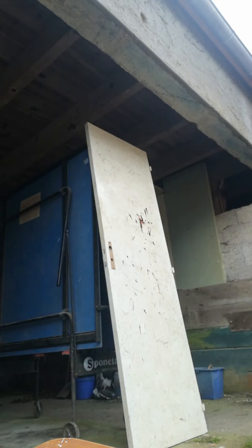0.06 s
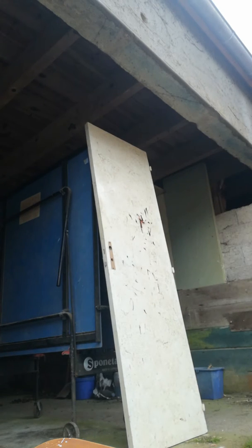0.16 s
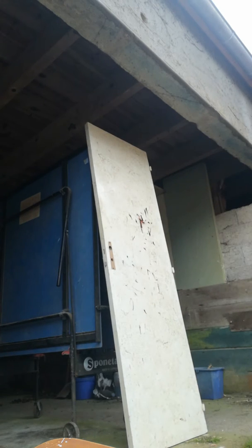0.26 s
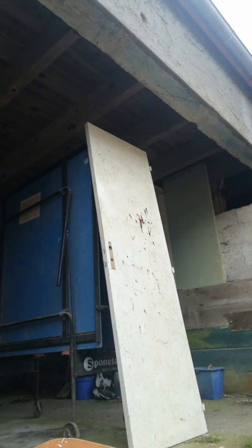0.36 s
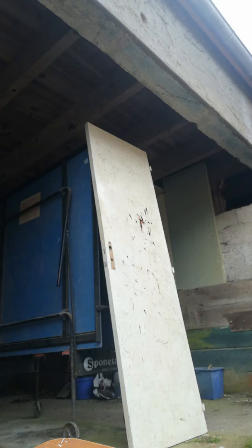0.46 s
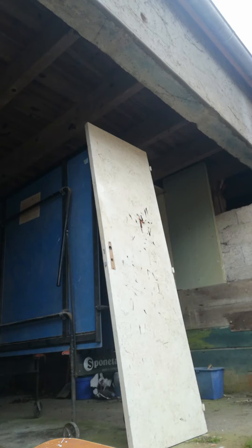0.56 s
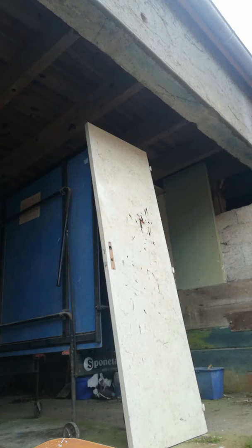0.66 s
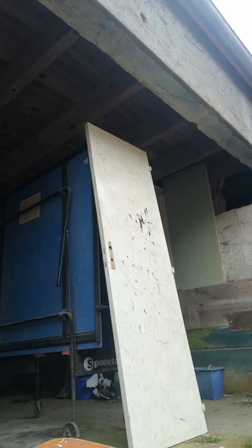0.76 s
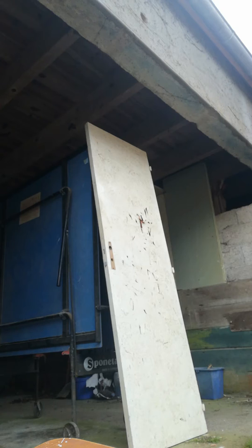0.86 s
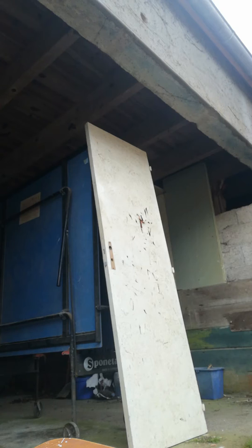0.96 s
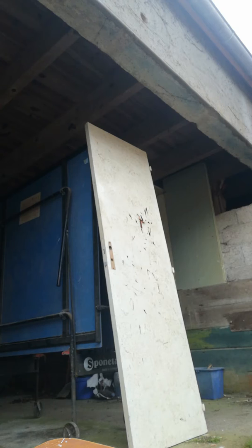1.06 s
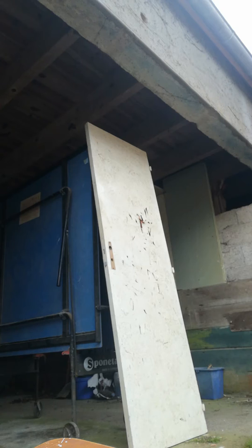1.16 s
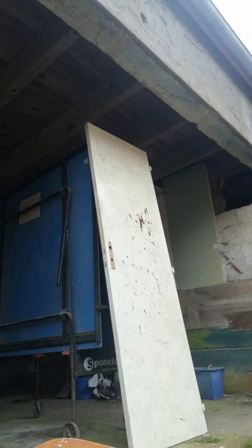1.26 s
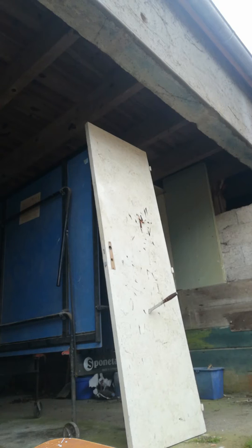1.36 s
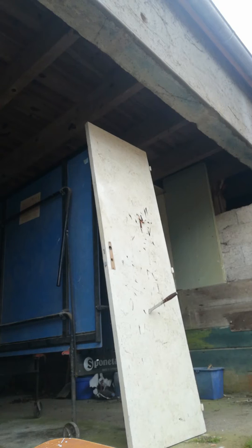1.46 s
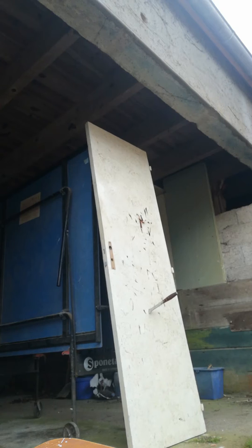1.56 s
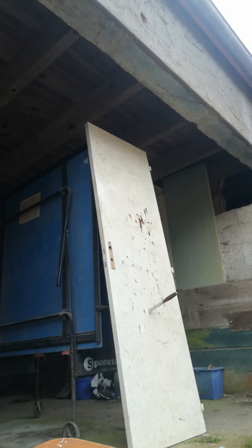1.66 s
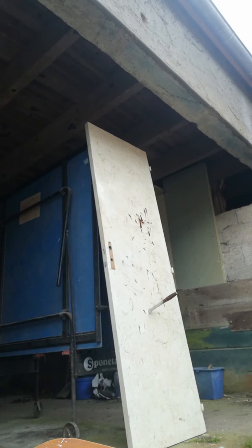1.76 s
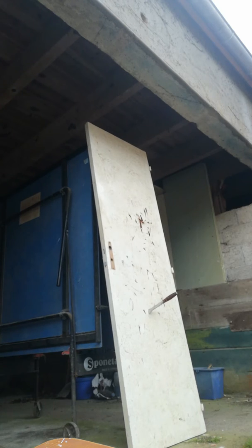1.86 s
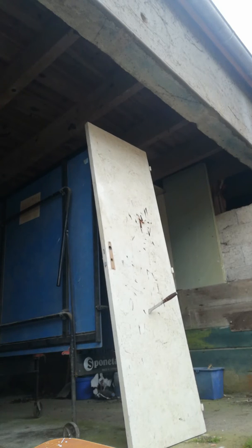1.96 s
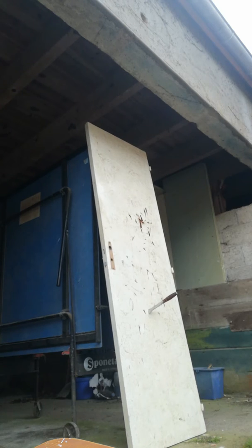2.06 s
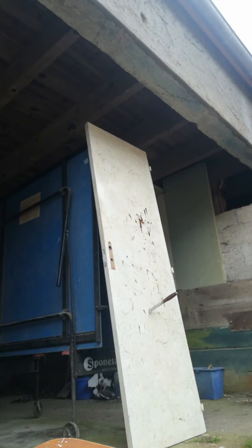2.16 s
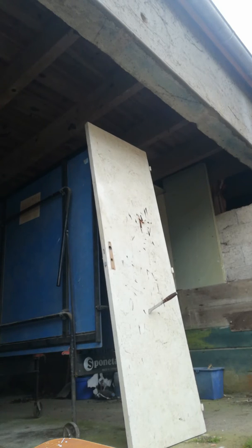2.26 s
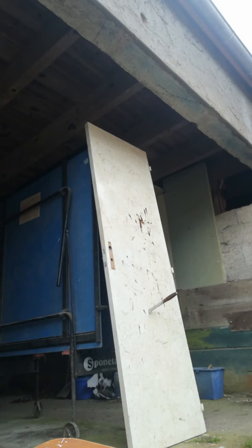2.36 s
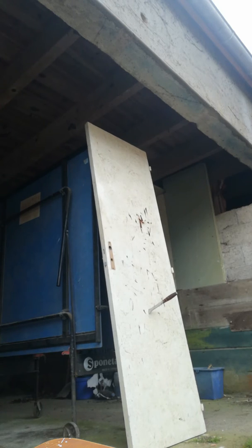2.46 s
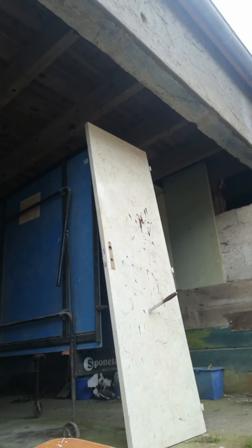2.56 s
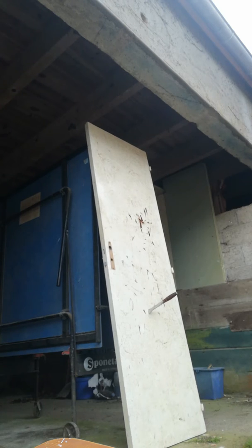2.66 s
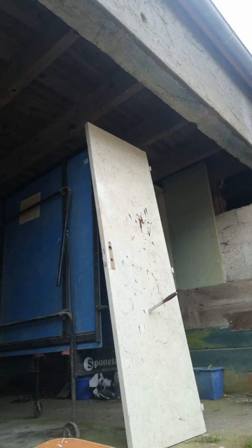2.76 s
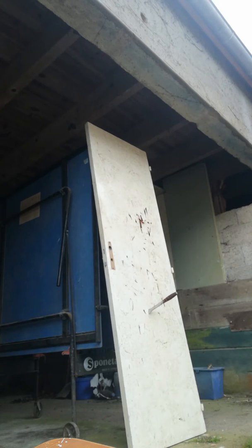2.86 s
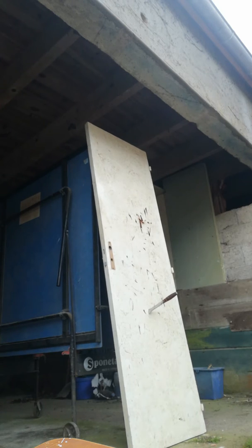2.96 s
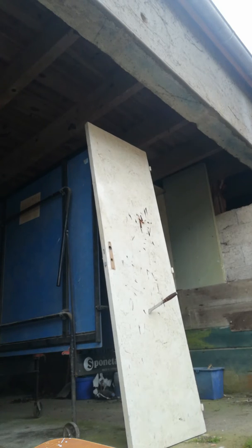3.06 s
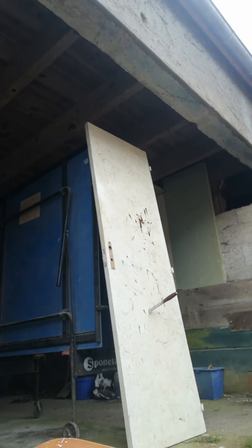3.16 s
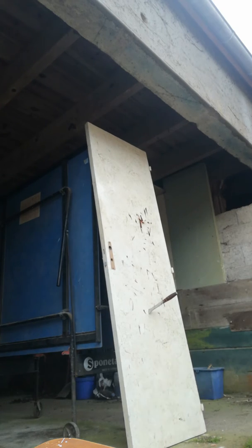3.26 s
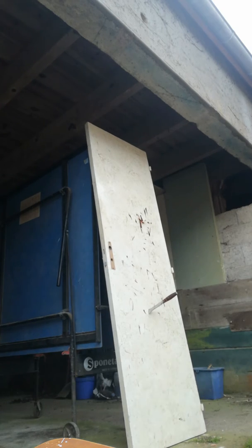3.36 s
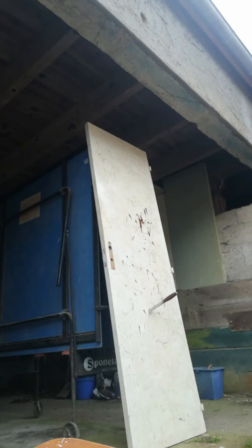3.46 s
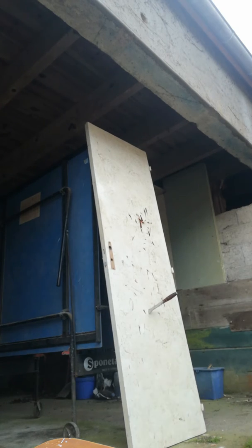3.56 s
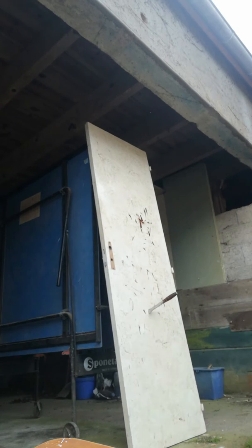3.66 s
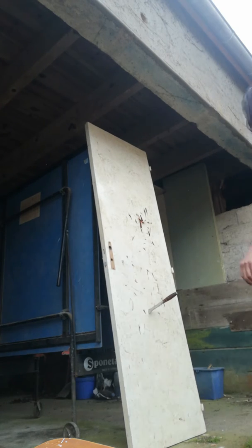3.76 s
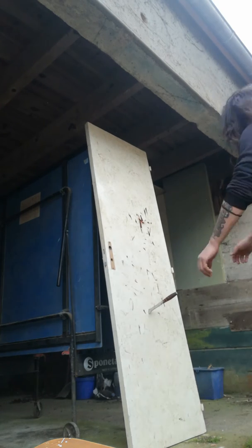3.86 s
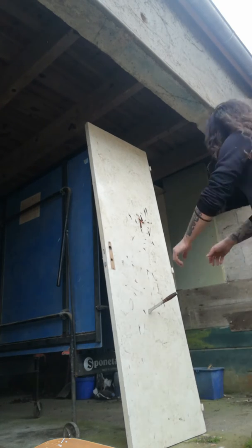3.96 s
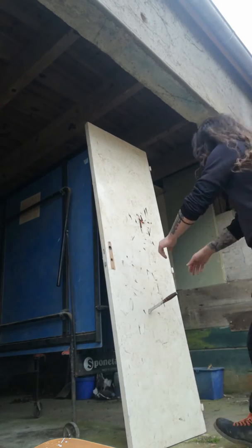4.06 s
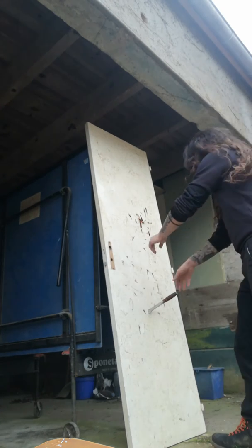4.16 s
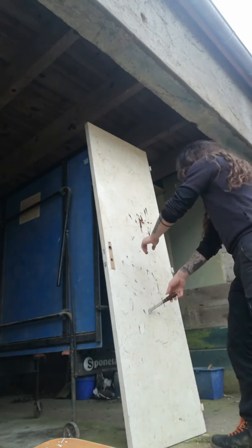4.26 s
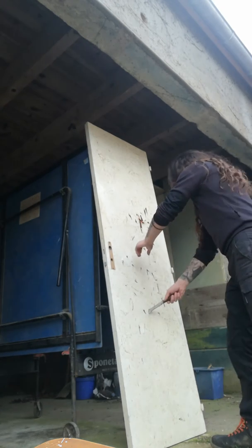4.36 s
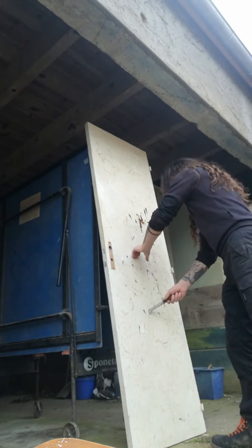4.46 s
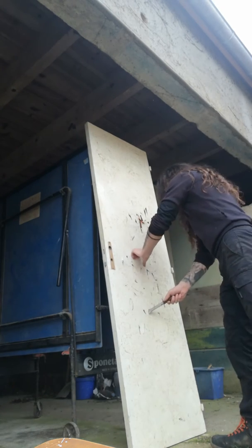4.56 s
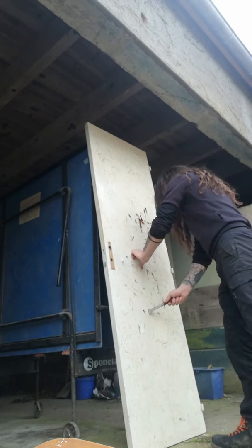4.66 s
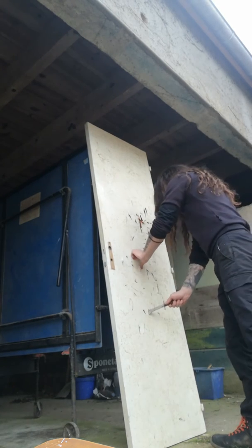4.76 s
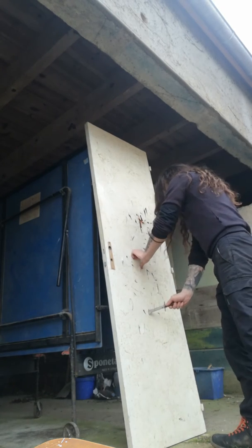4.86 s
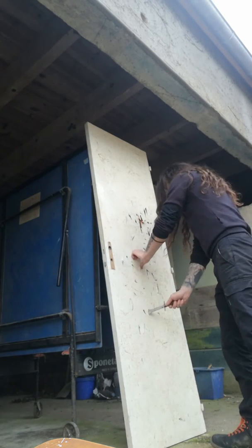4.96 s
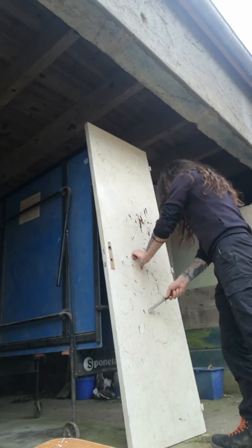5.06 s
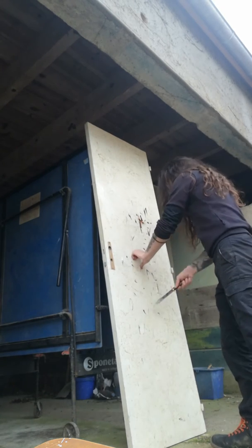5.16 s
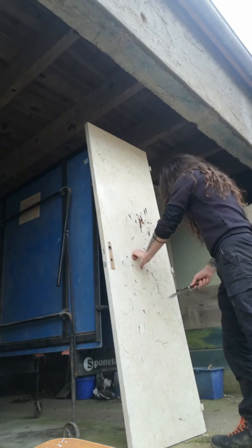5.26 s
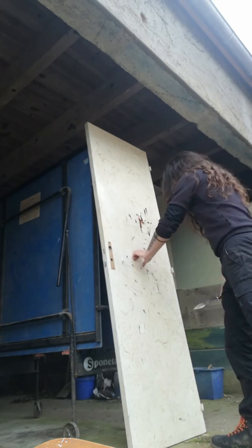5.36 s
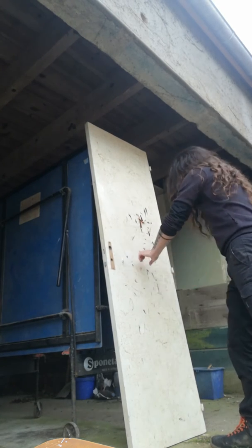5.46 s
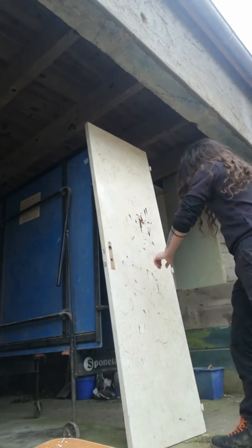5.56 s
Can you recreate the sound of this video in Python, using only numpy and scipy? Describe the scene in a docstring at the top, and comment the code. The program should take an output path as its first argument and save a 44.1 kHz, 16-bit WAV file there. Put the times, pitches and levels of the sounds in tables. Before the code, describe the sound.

Faint blade clinks and scuffs, a sudden loud knife hit in a hollow door, rocking thuds, footsteps, then gritty scraping and metallic chirps.

```python
"""A knife is thrown into an old wooden door that leans under a shed roof.
First blades clink in the hand and shoes scuff: modal rings with noise bursts, and grainy noise strokes.
The point cracks into the wood, the panel booms and rattles: shaped noise, modal rings, a gated sine.
Steps approach, a hand grips, the blade is levered out: noise chopped by random catches, then chirps.
Throughout, harmonics of a far-off engine hum through its gears over coloured noise for the air."""
import sys
import numpy as np
from scipy import signal
from scipy.fft import rfft, irfft
from scipy.io import wavfile
from scipy.ndimage import uniform_filter1d

SR = 44100
rng = np.random.default_rng(int(sys.argv[2]) if len(sys.argv) > 2 else 0)


def transcribe(u):
    """Save the signal u as a 16-bit wav file named by the first command-line argument.

    u: samples, shape (n,) or (channels, n), limited to [-1, 1]; the rate is SR.
    q: integer samples, one column per channel.
    """
    v = np.clip(np.atleast_2d(u).T, -1, 1)
    q = np.round(v * 32767).astype(np.int16)
    wavfile.write(sys.argv[1], SR, q)


N = 247401
TIME = np.arange(N) / SR
BINS = np.fft.rfftfreq(N, 1 / SR)

HIT_S = 1.3244
PANEL_HZ = 100.3  # main mode of the door panel
# stages of the blow: (level [dB], attack [s], hold [s], decay [s])
BITE_SHAPE = (-9, .0005, .004, .005)  # the point splits the wood
KNOCK_SHAPE = (-19, 0.0055, 0.0007, .009)  # the panel gives
RATTLE_SHAPE = (-21.8, .012, .04, .088)  # the door's skin rattles on
TICK_SHAPE, TICK_DELAY_S = (-13.5, .0004, .0008, .0012), .002  # the blade itself ticks as it stops dead
RATTLE_STOP_S, RATTLE_STOP_DECAY_S = .235, .03  # after the blow: the support damps the skin
CRACK_RISE_S = .0006  # the wood takes a moment to start ringing
# spectra of the splitting, the knock, the rattle and the clatter: (frequency [Hz], density [dB])
BITE_COLOUR = [(88, -36.5), (150, -6), (509, -18), (1020, -1.5), (1370, -8), (1950, -2.5), (2600, -8.5),
               (3150, -6.5), (4140, -16.5), (4740, -15), (6980, -12.5), (8320, -7.5), (12500, -30.5),
               (14600, -25), (15500, -39)]
KNOCK_COLOUR = [(200, -19.5), (480, -19), (740, 0), (880, -10.5), (1080, 2), (1300, -4), (1550, -18),
                (1950, -6), (2600, -13), (6000, -25)]
RATTLE_COLOUR = [(210, -16), (330, 1), (480, -16), (620, -11.5), (800, -4), (1030, -1), (1330, -1.5),
                 (1550, -6), (2100, -6.5), (2500, -10.5), (3400, -9.5), (5200, -11.5), (6600, -7.5),
                 (8000, -12.5), (10000, -13.5), (15500, -34)]
CLATTER_COLOUR = [(200, -12), (330, -3), (520, -12), (850, -1), (1250, 0), (1550, -7), (2050, -5),
                  (3300, -10), (5000, -21), (8000, -30), (15000, -50)]
# resonances of the door's skin: (frequency [Hz], width [Hz], lift [dB])
SKIN = [(889, 25, 6.5), (1045, 25, 6), (1162, 25, 5), (1228, 40, 5), (1346, 25, 5.5), (1480, 22, 7),
        (1637, 35, 4.5), (1710, 28, 8), (2050, 60, 5), (2610, 40, 2.5), (2960, 25, 5.5), (3100, 35, 7.5),
        (3300, 54, 3.5), (3720, 100, 4.5), (4264, 15, 2.5), (4833, 72, 3.5)]
# the loose skin and the support clatter as the door rocks: (time [s], level [dB], decay [s])
CLATTERS = [(1.3555, -23, .008), (1.377, -23.5, .011), (1.425, -31, .014), (1.47, -32.5, .016),
            (1.511, -32, .016), (1.539, -29, .022), (1.574, -34.5, .012), (1.613, -43, .012),
            (1.699, -46, .008), (1.727, -43, .022), (1.824, -47, .011), (1.848, -50, .01),
            (1.915, -51, .014), (1.962, -53, .015)]
# modes of the struck wood: (frequency [Hz], relative level [dB], t60 [s])
WOOD = [(700, -7, .4), (764, -5, .35), (889, -5, .55), (953, -1, .37), (1018, -6, .7), (1045, -3, .65),
        (1070, -4, .55), (1165, -3, .55), (1195, -4, .8), (1260, -1, .45), (1343, -1, .42), (1642, -3, .4),
        (1992, -7, .7), (2062, -7, .75), (2304, -14, .4), (2606, -8, .3), (2805, -12, .5), (3031, -14, .6),
        (3122, -13, .49), (3290, -11, .46), (3655, -11, .48), (4037, -12, .4), (4269, -12, .4),
        (4404, -12, .35), (4850, -17, .7)]
# short rings of the wood round the point: (time [s], frequency [Hz], level [dB], t60 [s])
CRACK_RINGS = [(1.3241, 2020, -9.5, .035), (1.3265, 960, -14, 0.03), (1.328, 3650, -18, 0.014),
               (1.331, 2750, -20, .03), (1.3342, 1130, -5.5, 0.026), (1.3335, 760, -14, 0.035)]


def strike():
    """Impact excitation: a broadband crack, free modes of the wood, then rattling and clattering contacts."""
    crack = envelope(HIT_S, *BITE_SHAPE) * noise(BITE_COLOUR)
    crack += envelope(HIT_S, *KNOCK_SHAPE) * noise(KNOCK_COLOUR)
    crack += envelope(HIT_S + TICK_DELAY_S, *TICK_SHAPE) * noise(SQUEAK_COLOUR)

    # the rattle strengthens once in every cycle of the panel
    slap = 1 + 0.2 * np.cos(2 * np.pi * PANEL_HZ * (TIME - HIT_S))
    damping = np.exp(-np.maximum(TIME - HIT_S - RATTLE_STOP_S, 0) / RATTLE_STOP_DECAY_S)
    rattle_level = envelope(HIT_S, *RATTLE_SHAPE) * damping * slap
    rattle = rattle_level * noise(RATTLE_COLOUR, grain_db=1.5, resonances=SKIN)
    rattle += bursts(CLATTERS) * noise(CLATTER_COLOUR, grain_db=1, resonances=SKIN)

    wood = np.zeros((2, N))
    add(wood, HIT_S, gain_of(-27) * np.array([ring(WOOD), ring(WOOD)]))
    for s, hz, db, t60 in CRACK_RINGS:
        tone = ring([(hz, db, t60)])
        add(wood, s, tone * np.minimum(TIME[:len(tone)] / CRACK_RISE_S, 1))
    sides = gain_of([[-2], [0]])  # the point lands right of centre
    return sides * (shed(crack, wet_db=-10) + wood) + shed(rattle, wet_db=-18)


# low modes of the panel, before softening: (frequency [Hz], relative level [dB], t60 [s])
DOOR = [(108.1, -8.5, 0.56), (133.5, -1, 0.37), (127.8, 0, 0.43), (167, -3, .4), (185.5, -4, 0.6),
        (205.2, -11, 2), (260.5, -6, .6), (280, -12, .9), (307.9, -4, 0.55), (332.2, -6, 0.55),
        (357.5, -5, .45), (385, -12, .45), (420, -15, .35), (515, -15, .35)]
# modes of the whole frame: (frequency [Hz], relative level [dB], t60 [s])
FRAME = [(59, -3.5, 0.36), (65, 0.5, .6)]
# a hand or the blade pushes the door: (time [s], low modes [dB], frame [dB])
THUMPS = [(4.357, -55.5, -65), (4.478, -52, -66.5), (4.585, -51, -55), (4.72, -53, -48), (5.061, -44, -58),
          (5.13, -48, -63)]
# spectrum of the rocking door's rumble: (frequency [Hz], density [dB])
RUMBLE_COLOUR = [(40, -28.5), (60, -18.5), (80, -13.5), (130, -0.5), (200, -6.5), (260, -3.5), (330, -10.5),
                 (450, -13), (600, -20), (1200, -18), (2200, -25.5), (4000, -53)]
RUMBLE_RISE_S, RUMBLE_HOLD_S, RUMBLE_DECAY_S = 0.0066, .02, .17
# rebounds and pushes are softer than the blow and wake the modes above 170 Hz less
SOFT_DB_PER_OCTAVE = 4


def boom():
    """Modal excitation: each contact wakes low modes of panel and frame, softer ones less in the highs."""
    out = swing()
    contacts = [(s, panel_db, frame_db) for s, _, _, panel_db, frame_db, _ in ROCKS] + list(THUMPS)
    for k, (s, panel_db, frame_db) in enumerate(contacts):
        soft = SOFT_DB_PER_OCTAVE if k else 0
        panel = [(hz, db - soft * max(np.log2(hz / 170), 0), t60) for hz, db, t60 in DOOR]
        modes = gain_of(panel_db) * ring(panel) + gain_of(frame_db) * ring(FRAME)
        add(out, s, modes * (1 - np.exp(-TIME[:len(modes)] / 0.0045)))
    # independent rumbles add in power
    power = sum(envelope(s, db, RUMBLE_RISE_S, RUMBLE_HOLD_S, RUMBLE_DECAY_S) ** 2 for s, *_, db in ROCKS)
    return out + np.sqrt(power) * noise(RUMBLE_COLOUR)


# the door is struck, then rocks back against its support:
# (time [s], swing [dB], swing length [s], low modes [dB], frame [dB], rumble [dB])
ROCKS = [(1.3252, -23.5, .205, -29.5, -49.5, -30), (1.553, -21.8, .125, -42, -44, -37.5),
         (1.686, -26.5, .094, -40, -39, -46), (1.799, -41, .07, -40.5, -48, -52),
         (1.884, -50, .07, -55, -47, -57), (1.972, -53, .08, -53, -45, -62)]
SWING_RISE_S, REBOUND_RISE_S = 0.0091, .035  # the main mode starts fast under the knife, slower on a rebound
SWING_SAG_DB_PER_S, REBOUND_SAG_DB_PER_S = 4, 98
SWING_STOP_S = .03  # the main mode is damped as the door swings back


def swing():
    """Interrupted resonance: the panel's main mode swells after each contact and dies before the next."""
    size = np.zeros(N)
    for k, (s, db, length, *_) in enumerate(ROCKS):
        rise, sag = (REBOUND_RISE_S, REBOUND_SAG_DB_PER_S) if k else (SWING_RISE_S, SWING_SAG_DB_PER_S)
        gate = np.clip((TIME - s) / rise, 0, 1)
        gate *= np.clip((s + length - TIME) / SWING_STOP_S, 0, 1)
        size += gate * gain_of(db - sag * np.clip(TIME - s - rise, 0, 1))
    return size * np.sqrt(2) * np.sin(2 * np.pi * PANEL_HZ * (TIME - HIT_S))


# the hand handles the wooden grip: (time [s], knock [dB], decay [s], creak [Hz], creak [dB])
GRIPS = [(0.305, -58, .01, 2300, -59), (0.358, -54, .0075, 2200, -56), (0.372, -61, .006, 1500, -61),
         (0.421, -55, .014, 1700, -59), (4.36, -48, .012, 2500, -49), (4.4775, -39.5, .01, 3650, -44),
         (4.519, -42, .0095, 3150, -45)]
GRIP_CREAK_S, GRIP_ROUGH = .016, .14  # the grip creaks under the fingers
# spectra of grip, scrape and squeak: (frequency [Hz], density [dB])
GRIP_COLOUR = [(100, -8.5), (280, 7), (450, -8.5), (800, -17), (1250, 0.5), (1550, -15.5), (2300, -3),
               (2900, 1.5), (3900, 1), (4600, -9), (7000, -13), (9400, -9.5), (12000, -33), (15500, -40)]
SCRAPE_COLOUR = [(150, -16), (250, -8), (450, -10.5), (600, -10.5), (900, -1.5), (1350, -5), (1800, -2),
                 (2800, 0), (3700, -1.5), (5400, -2.5), (8900, 1.5), (12000, -9.5), (15500, -17)]
SQUEAK_COLOUR = [(3000, -32), (5800, -11), (7000, -1), (8200, 5), (9000, -3.5), (10500, -19), (15000, -33)]
# two tugs work the blade loose: (time [s], length [s], scrape [dB], build-up [dB], release [s])
TUGS = [(4.62, .225, -39.5, 8.5, .055), (5.036, .056, -33, 10, .048)]
CATCHES_PER_S, CATCH_SPREAD_DB, CATCH_DECAY_S = 850, 3, .0007  # fibres catch and tear at random
# wood fibres let go of the steel with a snap: (time [s], level [dB], decay [s])
SLIPS = [(4.621, -46, .004), (4.628, -41.5, .008), (4.651, -36.5, .008), (4.685, -44, .004),
         (4.714, -44, .005), (4.7425, -44, .005), (4.766, -44, .005), (4.7922, -32, .0035),
         (4.8208, -39, .004), (4.836, -37, .009), (4.888, -42, .005), (5.034, -35, .002), (5.12, -33, .008)]
# the slot creaks round the blade: (time [s], frequency [Hz], level [dB])
CREAKS = [(4.628, 1300, -47), (4.834, 2800, -43), (4.839, 1400, -42)]
CREAK_S, CREAK_ROUGH = .01, .07
SLIDE_S, SLIDE_DB, SLIDE_RISE_S, SLIDE_FALL_S = 5.12, -35.5, .046, .056  # the blade slides free
# the blade rings on as it leaves the wood: (frequency [Hz], width [Hz], lift [dB])
FREE_BLADE = [(7250, 400, 9), (7850, 300, 8), (8350, 350, 13)]
# envelope of that ringing: (level [dB], attack [s], hold [s], decay [s])
FREE_SHAPE = (-41, .01, .01, .04)
# the blade chirps in the slot: (time [s], frequency [Hz], level [dB], length [s])
SQUEAKS = [(5.034, 8400, -30, .0035), (5.0925, 8300, -21, .007), (5.1195, 7800, -26, .004),
           (5.12, 4900, -33, .003), (5.1235, 8500, -18, .004), (5.1265, 7500, -18, .003),
           (5.130, 7700, -24, .007), (5.138, 7300, -28, .004), (5.1445, 7900, -23, .005)]
SQUEAK_ROUGH = .09
# the panel bends and groans under the hand: (time [s], level [dB], attack [s], hold [s], decay [s])
GROANS = [(4.58, -44, .015, .02, .015), (4.655, -36.5, .025, .015, .085)]
GROAN_HZ = 102
# modes in which the freed door hums: (frequency [Hz], relative level [dB])
FREED = [(67, -8), (132, 3.5), (183, -5)]
HUM_START_S = 5.05
# envelope of that hum: (level [dB], attack [s], hold [s], decay [s])
HUM_SHAPE = (-48.5, .03, .24, .04)


def pull():
    """Dry friction: random catches chop the scrape, the freed blade squeaks, and the panel groans and hums."""
    grip = bursts([row[:3] for row in GRIPS]) * noise(GRIP_COLOUR)
    for s, _, _, hz, db in GRIPS:
        add(grip, s, chirp(hz, db, GRIP_CREAK_S, GRIP_ROUGH))

    catches = (rng.random(N) < CATCHES_PER_S / SR) * gain_of(CATCH_SPREAD_DB * rng.standard_normal(N))
    chatter = evened(.25 + decaying(catches, CATCH_DECAY_S))
    drag = sum(tug(*row) for row in TUGS) * chatter + bursts(SLIPS)
    scrape = drag * (noise(SCRAPE_COLOUR, grain_db=.6, resonances=SKIN) + slot())
    for s, hz, db in CREAKS:
        add(scrape, s, chirp(hz, db, CREAK_S, CREAK_ROUGH))

    rub = strokes([(SLIDE_S, SLIDE_DB, SLIDE_RISE_S, SLIDE_FALL_S)])
    squeak = rub * noise(SQUEAK_COLOUR, grain_db=1.6)
    free_ring = noise(SQUEAK_COLOUR, grain_db=1.5, resonances=FREE_BLADE)
    squeak += envelope(SLIDE_S, *FREE_SHAPE) * free_ring
    for s, hz, db, length in SQUEAKS:
        add(squeak, s, chirp(hz, db, length, SQUEAK_ROUGH))

    bending = sum(envelope(*row) for row in GROANS)
    groan = bending * np.sqrt(2) * np.sin(2 * np.pi * GROAN_HZ * TIME)
    freed_modes = sum(gain_of(db) * np.sin(2 * np.pi * hz * TIME) for hz, db in FREED)
    hum = envelope(HUM_START_S, *HUM_SHAPE) * freed_modes
    return shed(grip, wet_db=-11) + shed(scrape, wet_db=-7) + shed(squeak, wet_db=-6) + groan + hum


def tug(s, length, db, build_db, release):
    """Friction under load: the blade starts to drag, grinds harder as the force builds, then eases."""
    to_go = np.clip(1 - (TIME - s) / length, 0, 1)
    return envelope(s, db, .004, length, release) * gain_of(-build_db * to_go)


# the slot pinches the blade and sings as the grip shifts: (frequency [Hz], width [Hz], level [dB])
SLOT = [(1500, 220, -18), (2800, 300, -13)]
SLOT_WANDER, SLOT_WANDER_S = .15, .025  # largest shift as a share of the frequency; time between new shifts


def slot():
    """Friction-driven resonance: noise fills modes whose frequencies wander as the blade is levered."""
    out = np.zeros((2, N))
    for hz, width, db in SLOT:
        knots = np.arange(0, N / SR + SLOT_WANDER_S, SLOT_WANDER_S)
        pinch = 1 + SLOT_WANDER * np.interp(TIME, knots, rng.uniform(-1, 1, len(knots)))
        out += gain_of(db) * resonate(noise(SCRAPE_COLOUR), hz * pinch, width)
    return out


# modes of a hand-held blade: (frequency [Hz], relative level [dB], full t60 [s])
BLADE = [(2490, -7, .14), (3765, -1, .2), (5035, -1, .22), (5588, -10, .13), (6330, 1, .16),
         (8950, -10, .14), (9625, -4, .18), (10800, -8, .13), (12190, -6, .1)]
# steel touches steel: (time [s], click [dB], buzz [dB], ring [dB],
# strongest partial [Hz], its lift [dB], share of the full ring time)
CLINKS = [(0.107, -35.5, -50, -56, 3765, 5, .8), (0.122, -49, -52, -60, 6330, 3, .9),
          (0.305, -49, -55, -70, 9625, 16, 1.1), (0.422, -57, -58, -78, 2490, 3, .5),
          (0.768, -51, -52, -66, 3765, 6, .6), (1.273, -36, -33.5, -48, 2560, 16, .5),
          (4.357, -33.5, -42, -60, 5035, 5, .55)]
# spectrum of the contact noise: (frequency [Hz], density [dB])
BLADE_COLOUR = [(300, -14), (1000, -9), (2500, -2), (3700, 1), (6500, 1.5), (9000, 3), (11200, 1),
                (12500, -11), (15000, -26)]
# one blade slides on another and sings faintly: (time [s], frequency [Hz], level [dB], length [s])
GLIDES = [(.31, 2380, -66, .07), (.715, 3300, -66, .08)]
GLIDE_ROUGH = .025
BUZZ_WIDTH_HZ, BUZZ_LIFT_DB = 280, 12  # contact broadens the blade's partials
BUZZ_DECAY_S = .028  # at the full ring time
LEAD_WIDTH_HZ = 500  # a touch favours the partials this close to its own
PAIR_SPREAD, PAIR_DB = .018, -3  # the blade's partials come in close pairs


def clinks():
    """Contact damping: a click, a brief buzz while steel touches steel, then free modes led by one partial."""
    click_peaks = [(hz, BUZZ_WIDTH_HZ, 7 + level) for hz, level, _ in BLADE]
    clicks = bursts([(s, db, .003) for s, db, *_ in CLINKS])
    out = clicks * noise(BLADE_COLOUR, resonances=click_peaks)
    for s, _, buzz_db, ring_db, lead_hz, lift_db, free in CLINKS:
        peaks = [(hz, BUZZ_WIDTH_HZ, BUZZ_LIFT_DB + level) for hz, level, _ in BLADE]
        peaks.append((lead_hz, BUZZ_WIDTH_HZ, lift_db))
        out += bursts([(s, buzz_db, BUZZ_DECAY_S * free)]) * noise(BLADE_COLOUR, resonances=peaks)
        modes = []
        for hz, level, t60 in BLADE:
            lead = lift_db * np.exp(-((hz - lead_hz) / LEAD_WIDTH_HZ) ** 2)
            modes.append((hz, ring_db + level + lead, t60 * free))
        modes += [(hz * (1 - PAIR_SPREAD * rng.uniform(.5, 1.5)), db + PAIR_DB, t60) for hz, db, t60 in modes]
        add(out, s, np.array([ring(modes), ring(modes)]))
    for s, hz, db, length in GLIDES:
        add(out, s, chirp(hz, db, length, GLIDE_ROUGH))
    return shed(out, wet_db=-11)


# soles slide on gritty concrete: (peak time [s], level [dB], rise [s], fall [s])
SCUFFS = [(0.906, -46.5, 0.018, .052), (1.05, -57, .07, .09), (1.147, -39, .014, .022),
          (1.94, -53.5, .065, .11), (2.27, -57, .09, 0.11), (2.39, -50, .03, .065),
          (2.98, -44, .033, 0.095), (3.44, -64.5, 0.062, 0.073), (3.645, -44, 0.029, .045),
          (4.37, -56.5, .05, 0.035), (4.57, -59, .06, .05)]
# grit snaps under a sole: (time [s], level [dB], decay [s])
GRIT = [(1.1465, -35.5, 0.007), (2.352, -46.5, 0.0051), (2.933, -39, .006), (3.598, -42.5, .006)]
# small stones click under a sole: (time [s], level [dB], decay [s])
STONES = [(1.118, -46, .002), (1.1255, -39.5, .003), (2.157, -44, .0022), (2.1705, -43, .002),
          (2.1745, -46, .002), (2.2335, -42.5, .0018), (2.2555, -41, .002), (2.275, -52, .004),
          (2.291, -52, .005)]
# heels meet the ground: (time [s], level [dB], decay [s])
HEELS = [(0.892, -50.5, 0.029), (2.351, -45, 0.015), (2.93, -52, 0.031), (4.17, -53, .015)]
# spectra of scuffs, stones and heels: (frequency [Hz], density [dB])
SCUFF_COLOUR = [(240, -38.5), (400, -13), (1300, -8), (2200, -9.5), (3300, -6), (3730, -6.5), (4620, -6.5),
                (6980, -2.5), (8650, -5.5), (9930, 0), (12900, -11), (15500, -26.5)]
STONE_COLOUR = [(300, -20), (1200, -8), (1900, 2), (3200, 0), (4500, -9), (9000, -12), (15000, -24)]
HEEL_COLOUR = [(60, -2), (150, 0), (300, 1), (450, -8), (700, -9.5), (1200, -17), (2200, -21.5),
               (5000, -39.5)]
SAND_PER_S, SAND_DB, SAND_DECAY_S = 70, 6, .0006  # finer grains crack at random while a sole slides


def footwork():
    """Granular friction and impact: soles grind over grit, stones click and heels land."""
    cracks = (rng.random(N) < SAND_PER_S / SR) * rng.random(N)
    sand = 1 + gain_of(SAND_DB) * decaying(cracks, SAND_DECAY_S)
    soles = (strokes(SCUFFS) * sand + bursts(GRIT)) * noise(SCUFF_COLOUR, grain_db=1.5)
    stones = bursts(STONES) * noise(STONE_COLOUR)
    heels = bursts(HEELS) * noise(HEEL_COLOUR)
    return shed(soles + stones + heels, wet_db=-10)


# a sleeve sweeps through the throw and falls back: (peak time [s], level [dB], rise [s], fall [s])
SLEEVES = [(1.0, -59.5, .08, 0.19), (1.245, -49.5, .065, 0.065), (1.98, -55.5, 0.17, .14),
           (2.175, -55, .015, .08)]
# spectrum of the cloth: (frequency [Hz], density [dB])
SLEEVE_COLOUR = [(200, -6.5), (500, -5.5), (900, -5), (1400, 1), (2500, -0.5), (3600, 4), (5000, -6.5),
                 (8000, -15.5), (15000, -38)]


def sleeve():
    """Cloth friction: uneven noise that swells and eases with the arm."""
    return strokes(SLEEVES) * noise(SLEEVE_COLOUR, grain_db=3)


# a far-off engine pulls up through its gears: (time [s], firing rate [Hz])
ENGINE_SPEED = [(0, 68), (0.42, 76), (0.58, 57.5), (1.1, 60), (2.1, 70), (2.7, 73.5), (3.25, 76),
                (3.42, 61), (5.6, 63)]
# its harmonics: (multiple of the firing rate, relative level [dB])
ENGINE_ORDERS = [(1, -6), (2, 0), (3, -10), (4, -9), (6, -19)]
ENGINE_DB, ENGINE_WAVER_DB = -59.5, 2


def engine():
    """Harmonic series: only low orders of a distant engine arrive, each fading in and out on the way."""
    turns = np.cumsum(np.interp(TIME, *np.transpose(ENGINE_SPEED))) / SR
    out = np.zeros(N)
    for order, db in ENGINE_ORDERS:
        level = gain_of(ENGINE_DB + db + ENGINE_WAVER_DB * drift())
        out += level * np.sin(2 * np.pi * (round(order) * turns + rng.random()))
    return out


# spectrum of the outdoor air: (frequency [Hz], density [dB])
AIR = [(12, -30), (24, 0), (40, -8), (65, -4), (92, -13), (128, -10), (150, -11), (180, -16), (219, -11),
       (300, -11), (360, -15), (440, -17), (540, -21), (1260, -19.5), (1720, -23.5), (3000, -21.5),
       (5000, -25), (10500, -28), (12500, -34), (15500, -37)]
AIR_DB, AIR_SWELL_DB = -59.3, .7


def air():
    """Stationary broadband noise: outdoor air that swells a little at random."""
    return gain_of(AIR_DB + AIR_SWELL_DB * drift()) * noise(AIR)


# reverberation time under the roof: (frequency [Hz], t60 [s])
SHED = [(100, 0.53), (400, 1), (1200, 1), (4000, 0.76), (8000, 0.28), (14000, 0.14)]


def shed(x, wet_db):
    """Reverberation: sparse echoes of roof and walls, each band dying at its own speed."""
    taps = rng.standard_normal((2, SR)) * (rng.random((2, SR)) < .1) * (TIME[:SR] > .004)
    hz, t, z = signal.stft(taps, SR, nperseg=256)
    decay = gain_of(-60 * t / curve_at(SHED, hz)[:, None])
    tail = signal.istft(z * decay, SR, nperseg=256)[1]
    tail /= np.linalg.norm(tail, axis=1, keepdims=True)
    return x + gain_of(wet_db) * signal.fftconvolve(x, tail, axes=1)[:, :N]


# how alike left and right are: (frequency [Hz], correlation)
LIKENESS = [(60, 1), (130, 0.99), (290, .85), (640, 0), (1400, 0.41), (3100, 0), (15000, 0.28)]


def noise(colour, grain_db=0, resonances=()):
    """Filtered noise, correlated between two ports by frequency; grains make it crackle, resonances ring."""
    grains = np.repeat(np.minimum(rng.exponential(1, N // 32 + 1), 4), 32)[:N]
    a, b = rfft(rng.standard_normal((2, N)) * gain_of(grain_db * grains))
    same = np.clip(curve_at(LIKENESS, BINS), -1, 1)
    db = curve_at(colour, BINS)
    for hz, width, lift in resonances:
        db = db + lift / (1 + (2 * (BINS - hz) / width) ** 2)
    ports = np.array([same * a + np.sqrt(1 - same ** 2) * b, a])
    return evened(irfft(ports * gain_of(db), N))


def ring(modes):
    """Modal decay: dying sines of one struck object, rows (Hz, dB, t60 s)."""
    t, out = TIME[:SR * 3 // 2], 0
    for hz, db, t60 in modes:
        out = out + gain_of(db - 60 * t / t60) * np.sin(2 * np.pi * (hz * t + rng.random()))
    return out


def chirp(hz, db, length, rough):
    """Frequency modulation: a brief, unsteady tone that swells and stops."""
    t = np.arange(0, length, 1 / SR)
    waver = evened(uniform_filter1d(rng.standard_normal(len(t)), size=24))
    phase = 2 * np.pi * np.cumsum(hz * (1 + rough * waver)) / SR
    return gain_of(db) * np.sin(np.pi * t / length) * np.sin(phase)


def resonate(x, hz, width):
    """Heterodyne resonance: shifts the curve hz to zero, low-passes there, and shifts back."""
    turn, r = np.exp(2j * np.pi * np.cumsum(hz) / SR), np.exp(-np.pi * width / SR)
    narrow = signal.lfilter([(1 - r) ** 2], [1, -2 * r, r * r], x / turn)
    return evened((turn * narrow).real)


def envelope(s, db, attack, hold, decay):
    """Transient envelope: rises from s seconds, holds, then dies away exponentially."""
    t = TIME - s
    return gain_of(db) * np.clip(t / attack, 0, 1) * np.exp(-np.maximum(t - attack - hold, 0) / decay)


def bursts(rows):
    """Impulsive envelope: sudden starts that decay exponentially, rows (s, dB, decay s)."""
    out, t = np.zeros(N), TIME[:SR // 4]
    for s, db, decay in rows:
        add(out, s, gain_of(db) * np.exp(-t / decay))
    return out


def strokes(rows):
    """Gesture envelope: movements swell to a peak and ease off, rows (peak s, dB, rise s, fall s)."""
    out = np.zeros(N)
    for s, db, rise, fall in rows:
        distance = abs((TIME - s) / np.where(TIME < s, rise, fall))
        out += gain_of(db) * np.exp(-distance ** 1.4)
    return out


def decaying(impulses, decay):
    """Exponential relaxation: every impulse dies away with a time constant in seconds."""
    return signal.lfilter([1], [1, -np.exp(-1 / (decay * SR))], impulses)


def drift():
    """Superposition: slow sines of random phase make a wander of rms 1."""
    return evened(sum(np.sin(2 * np.pi * (rate * TIME + rng.random())) for rate in np.geomspace(.2, 4, 10)))


def gain_of(db):
    """Logarithmic level: decibels to amplitude."""
    return 10 ** (np.asarray(db) / 20)


def evened(x):
    """Power normalisation: scales each channel to rms 1."""
    return x / np.sqrt(np.mean(x ** 2, axis=-1, keepdims=True) + 1e-20)


def curve_at(points, hz):
    """Logarithmic pitch scale: interpolates a curve over log frequency."""
    f, value = np.transpose(points)
    return np.interp(np.log(hz + 1), np.log(f + 1), value)


def add(mix, s, sound):
    """Linear superposition: mixes a sound in at s seconds."""
    part = mix[..., round(s * SR):][..., :sound.shape[-1]]
    part += sound[..., :part.shape[-1]]


def scene():
    """Linear superposition of all sources over the outdoor air."""
    return strike() + boom() + clinks() + footwork() + sleeve() + pull() + air() + engine()


# the left port's response against the right: (frequency [Hz], level [dB])
LEFT_PORT = [(60, 3), (220, -1), (380, -2), (700, -8), (1300, -3.5), (2400, -7), (4400, -2), (8100, -4),
             (15000, -14.5)]
LEFT_LAG_S = .00009  # the sound reaches the left port a little later
EDGE_HZ = 15700  # upper band limit


def record(dry):
    """Interaural-style difference, saturation, band limit: left is shaded and late, high peaks clip."""
    left = gain_of(curve_at(LEFT_PORT, BINS)) * np.exp(-2j * np.pi * BINS * LEFT_LAG_S)
    ports = irfft(rfft(dry) * np.array([left, np.ones(len(BINS))]), N)
    clipped = np.clip(ports, -.95, .95)
    low_pass = signal.firwin(511, EDGE_HZ, window=("kaiser", 9), fs=SR)
    return signal.oaconvolve(clipped, low_pass[None], "same")


dry = scene()
out = record(dry)
transcribe(out)
```